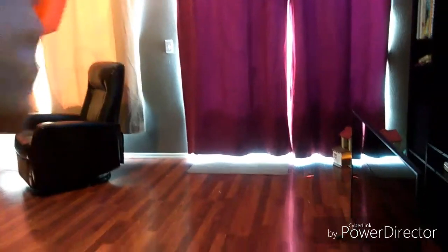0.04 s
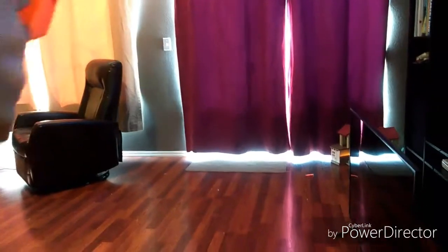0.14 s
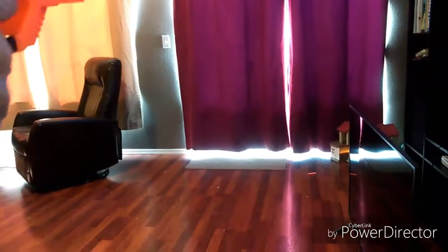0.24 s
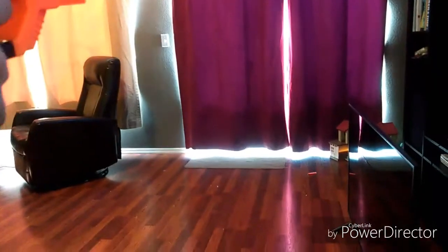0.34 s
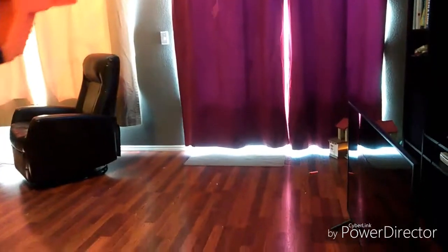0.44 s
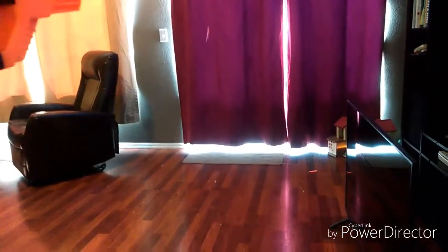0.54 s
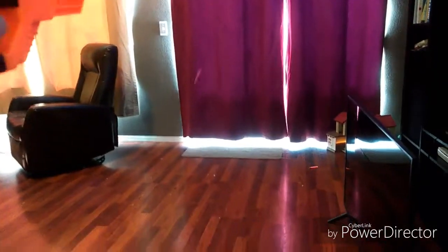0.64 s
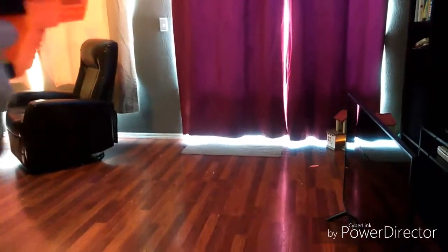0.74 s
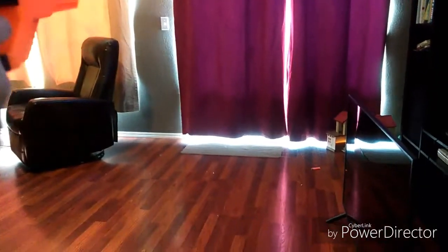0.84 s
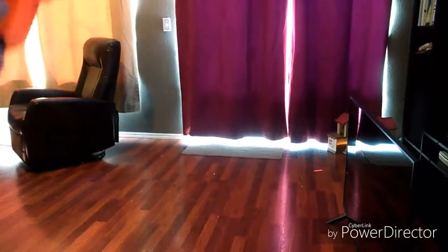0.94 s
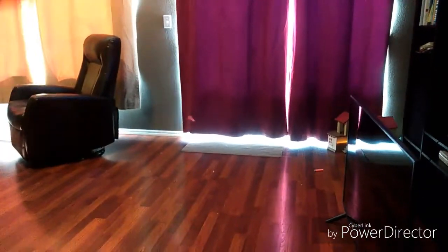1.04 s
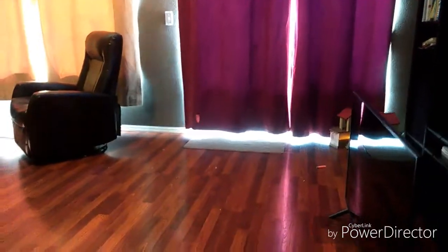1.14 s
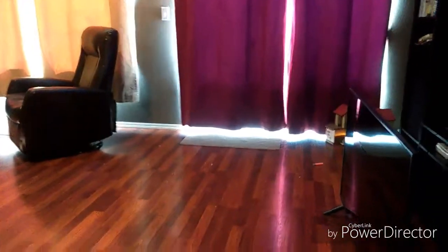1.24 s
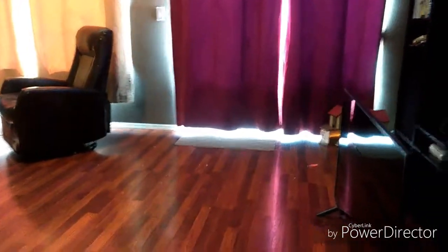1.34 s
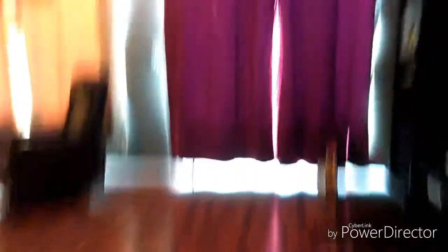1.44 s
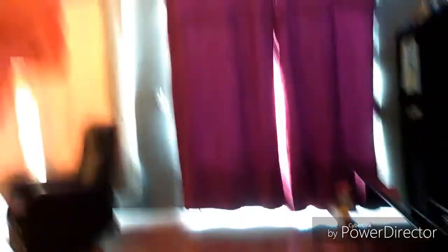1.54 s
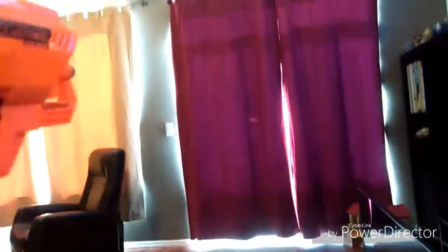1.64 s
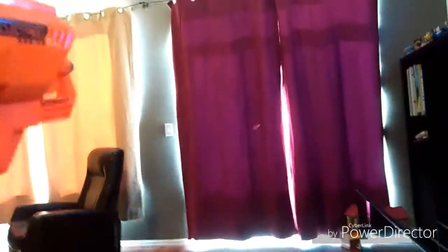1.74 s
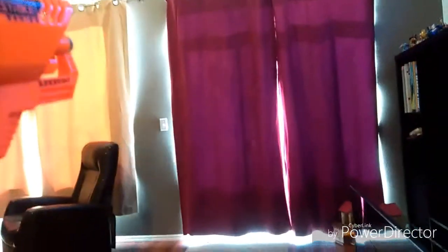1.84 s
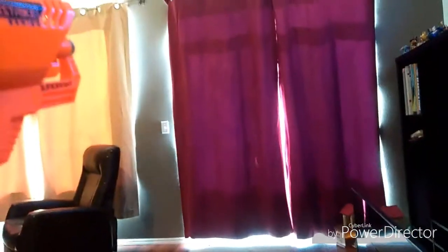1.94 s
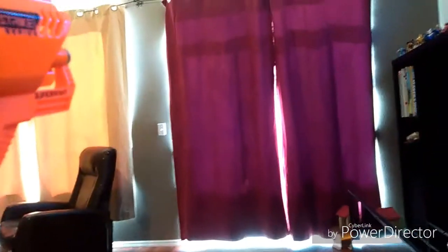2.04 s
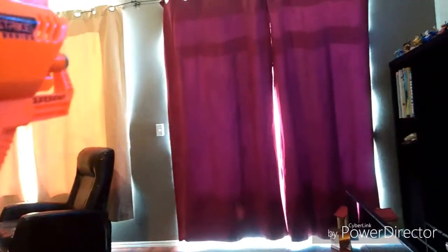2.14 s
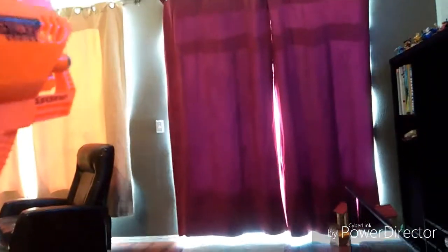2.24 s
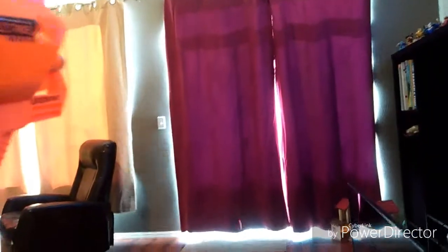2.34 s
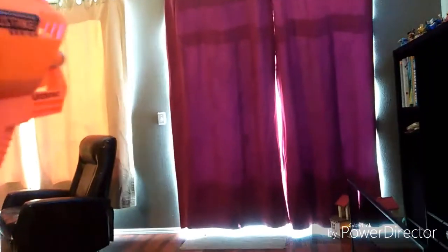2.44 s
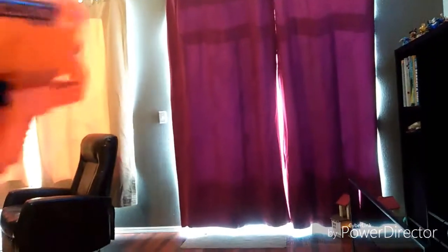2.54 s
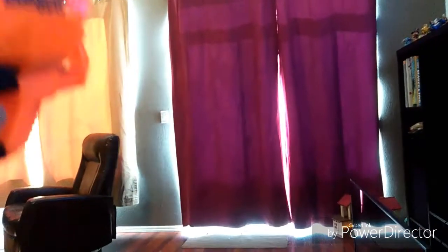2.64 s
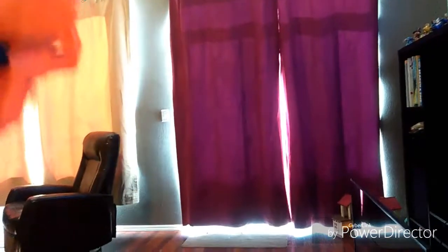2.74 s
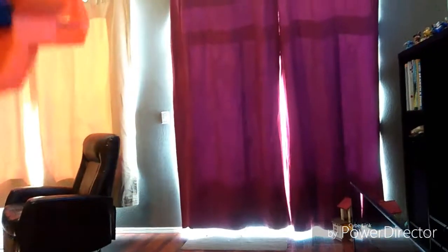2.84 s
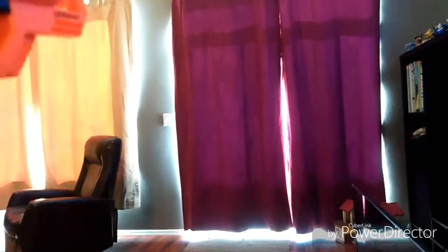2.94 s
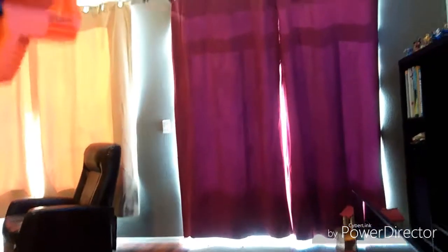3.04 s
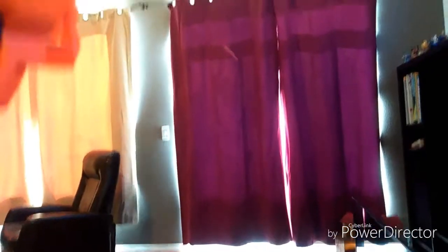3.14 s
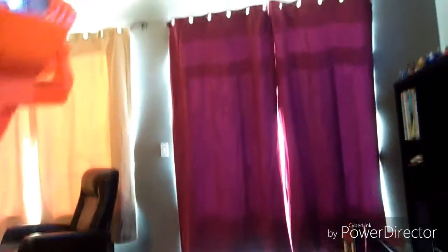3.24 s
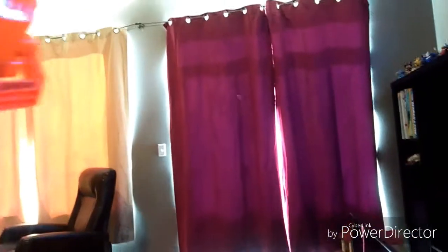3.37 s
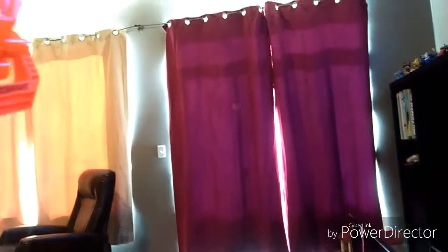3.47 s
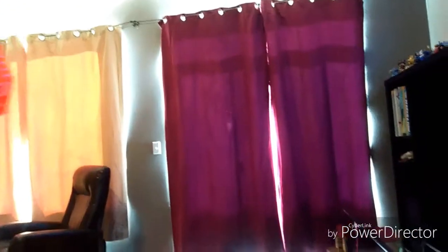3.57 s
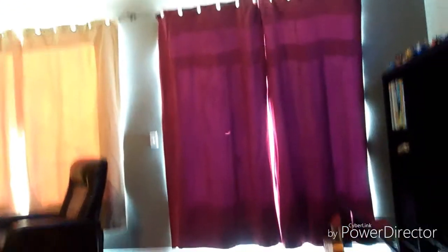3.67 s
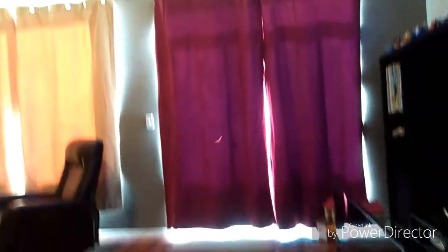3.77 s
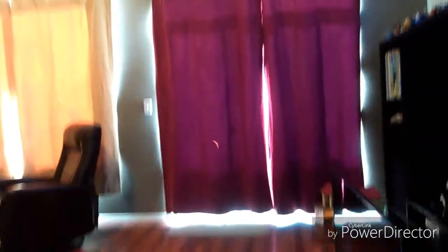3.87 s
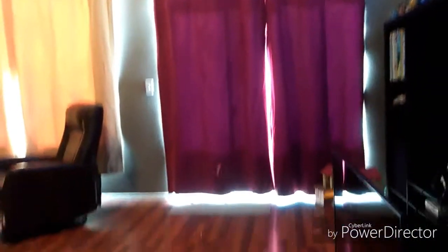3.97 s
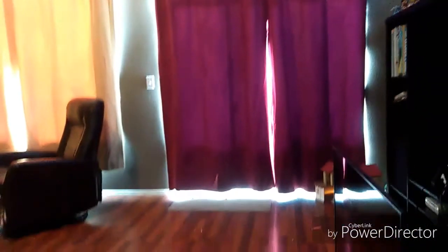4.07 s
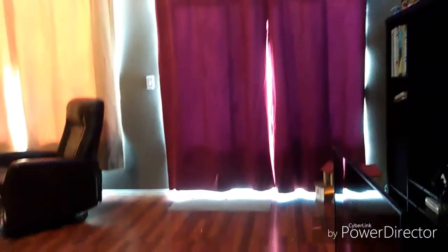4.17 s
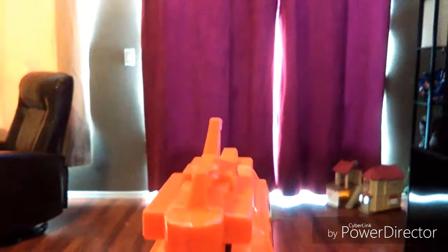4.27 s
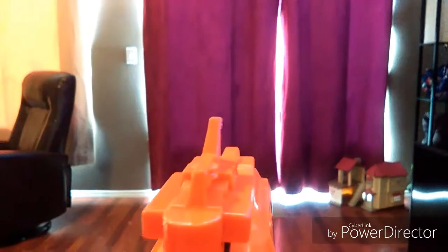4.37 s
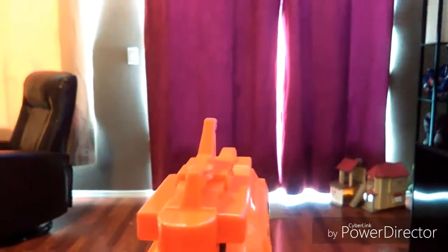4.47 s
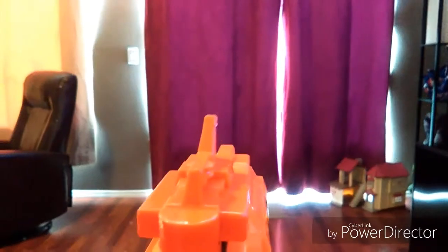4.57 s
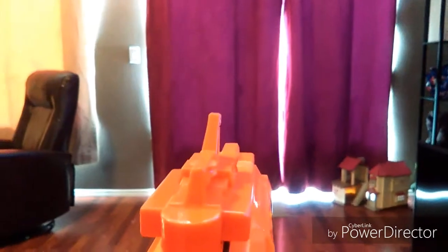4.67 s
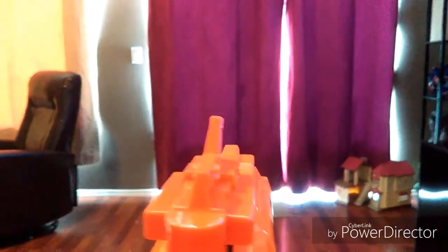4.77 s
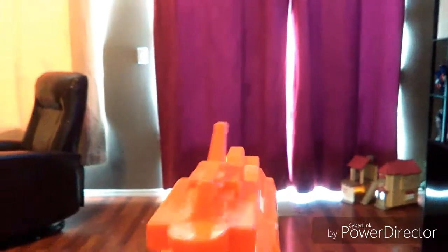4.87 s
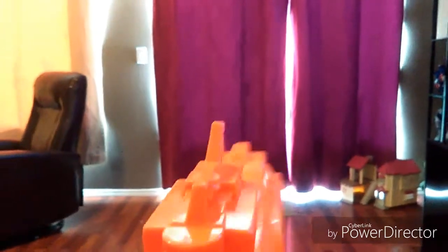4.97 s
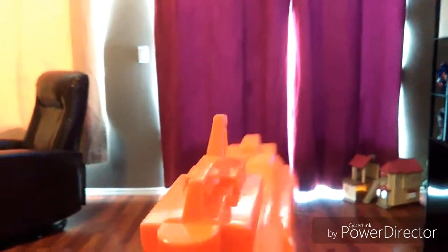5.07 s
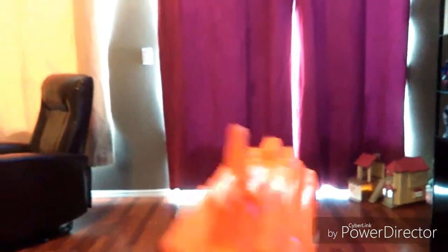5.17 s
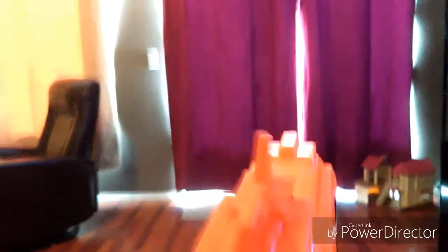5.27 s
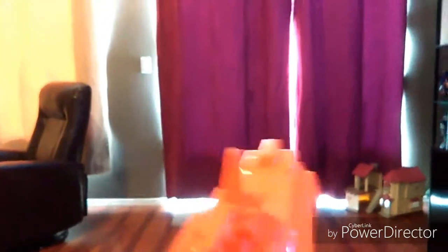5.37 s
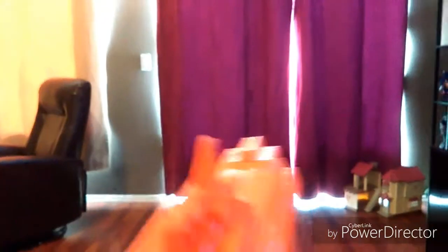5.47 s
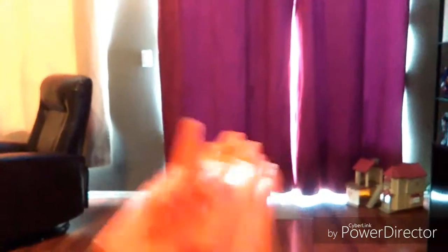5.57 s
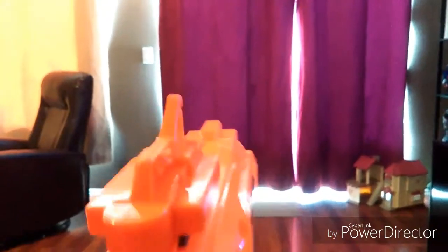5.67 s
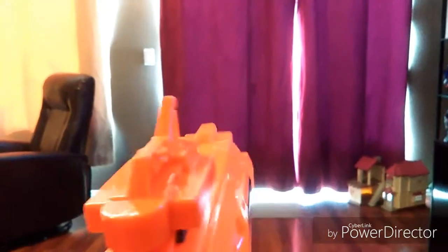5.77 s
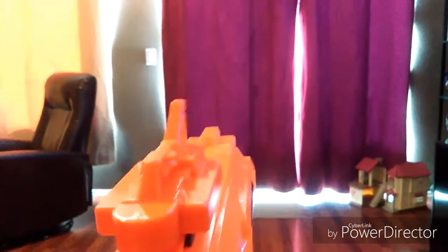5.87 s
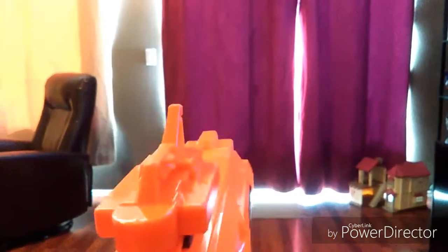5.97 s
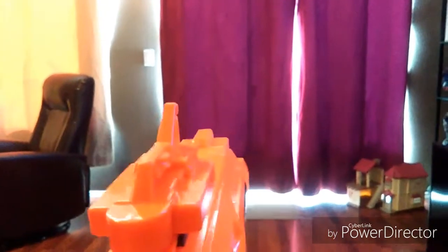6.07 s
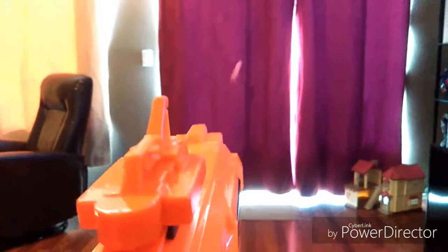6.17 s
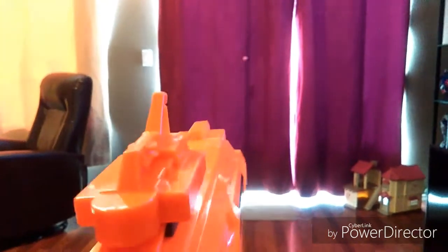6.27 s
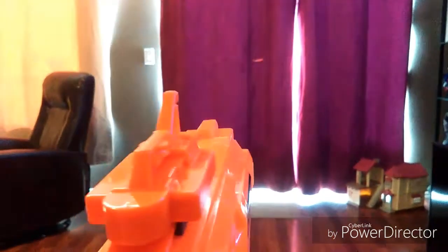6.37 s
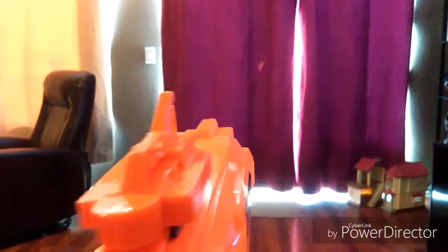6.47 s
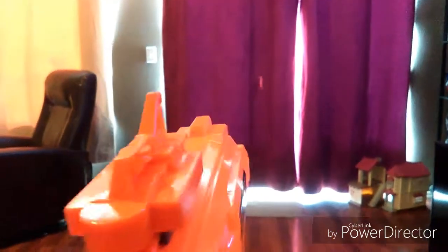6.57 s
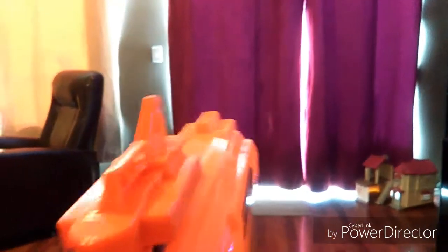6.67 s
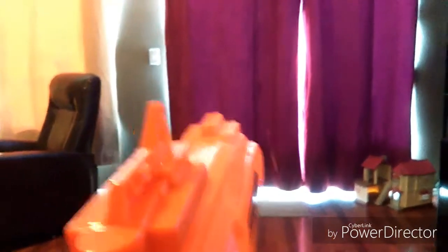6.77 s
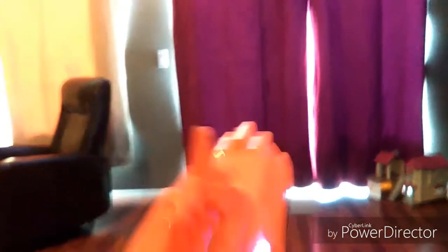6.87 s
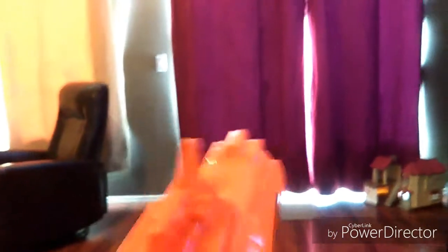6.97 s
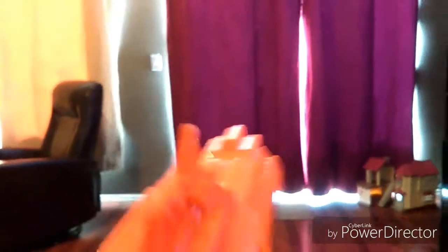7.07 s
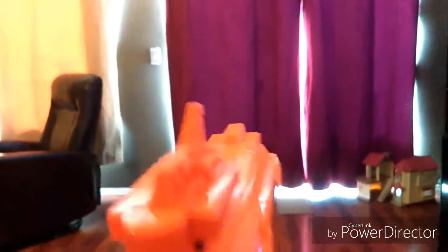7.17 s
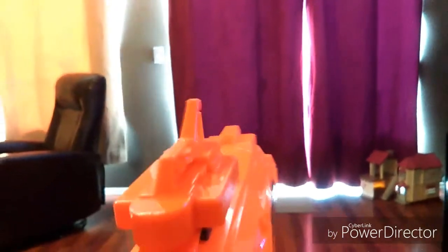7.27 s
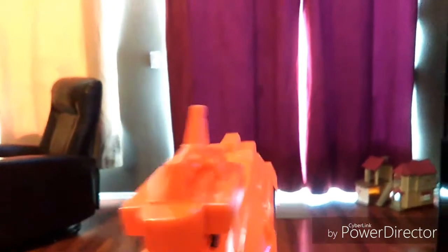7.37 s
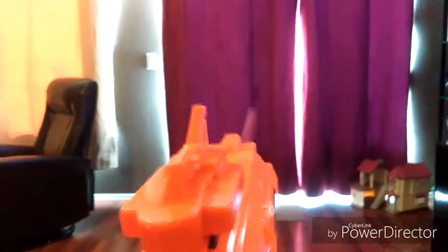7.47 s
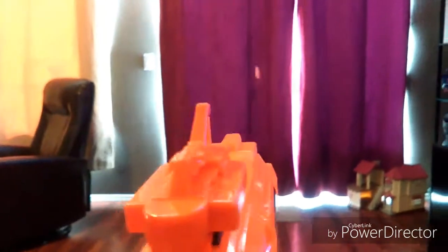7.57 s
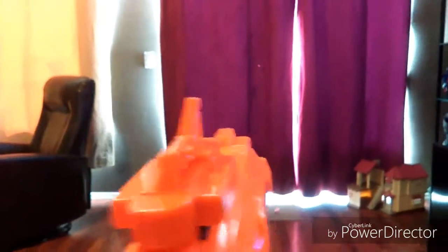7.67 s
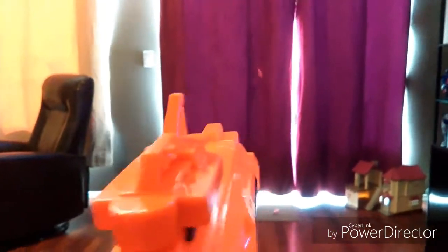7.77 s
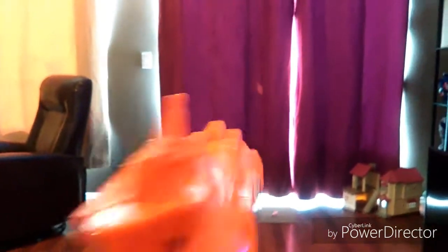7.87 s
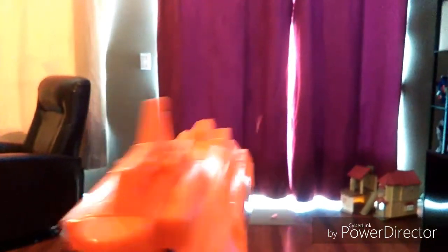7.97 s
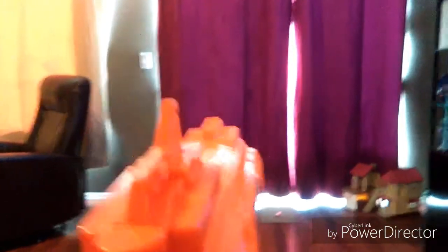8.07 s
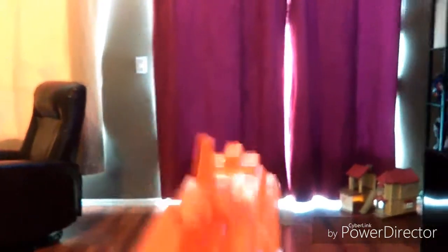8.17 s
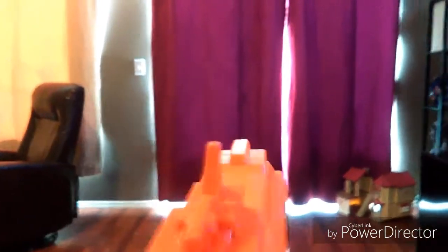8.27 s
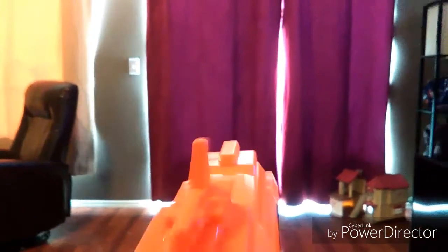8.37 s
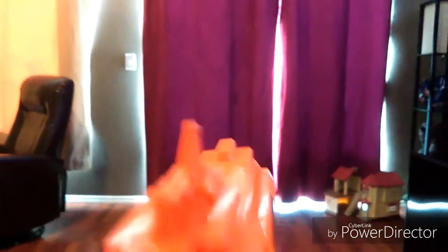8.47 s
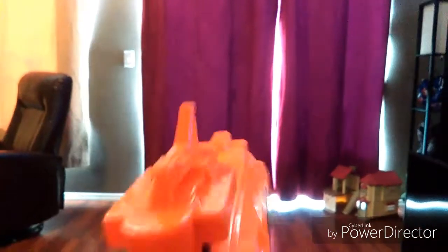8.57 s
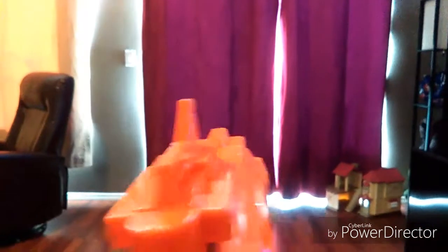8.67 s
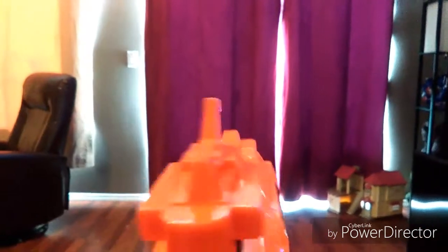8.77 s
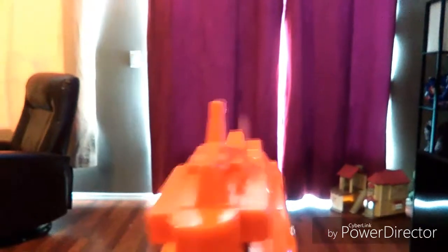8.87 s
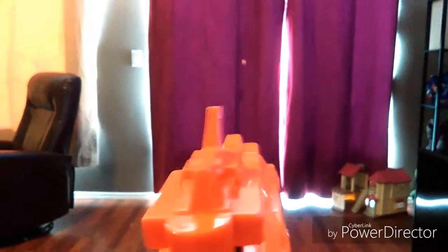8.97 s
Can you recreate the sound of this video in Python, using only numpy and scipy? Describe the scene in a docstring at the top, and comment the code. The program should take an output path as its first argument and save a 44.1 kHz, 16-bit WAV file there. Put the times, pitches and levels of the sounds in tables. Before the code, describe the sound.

Close stereo pickup of a hollow plastic toy dart blaster in a reverberant hard-floored living room, over low house rumble, faint hiss and, until 4.2 s, a very faint steady tone. A slide scrape leads to a shot at 0.2 s: a rapid cluster of snaps, a ringing tube and spring, then a dart thudding softly into a curtain at 0.4. Loud racking clacks come at 0.8-1.1, a shot at 1.6 and thud at 1.85. Small fumbling ticks build into hard clacks at 2.7-3.0; a shot at 3.3 rings long, thud at 3.5. Sound cuts to silence at 4.2, then fades in from about 4.4 to 4.75, blaster more to the left. Scraping and clacks at 5.1-5.7, shot at 6.35, thud at 6.6; racking at 6.9-7.3, shot at 7.7, ticking thud at 7.9; final racking at 8.2-8.6, then light clicks to 9.0.

```python
"""A toy dart blaster is primed and fired five times close to a camera in a hard-floored living room.
The slide scrapes in noisy slips; slide, catch and trigger clack in crackles that ring the shell.
Each plunger slam rings tube and spring as decaying sines; each dart thuds into a curtain across the room.
Low house rumble, hiss and at first a faint tone lie beneath. After a short silence the sound fades
in again with the blaster held at another place."""
import sys
import numpy as np
from scipy import signal
from scipy.fft import rfft, irfft
from scipy.io import wavfile
from scipy.ndimage import uniform_filter1d

SR = 44100
rng = np.random.default_rng(int(sys.argv[2]) if len(sys.argv) > 2 else 0)


def log_audio(samples):
    """Write samples as a 16-bit WAV file to the path given in sys.argv[1]."""
    # one column per channel
    frames = np.atleast_2d(samples).T
    # limit to full scale, then quantise
    limited = np.clip(frames, -1, 1)
    pcm = np.round(limited * 32767).astype(np.int16)
    wavfile.write(sys.argv[1], SR, pcm)


N = 397782

# colour of the plastic shell at the first place: [hz, density_db (per Hz)]
SHELL_COLOUR = [(150, -56), (250, -27.5), (906, -8), (1580, -6.5), (1880, -7), (2320, -5), (3230, -2.5),
                (4410, -8), (5540, -9), (6470, -13), (13700, -28.5), (15200, -41), (16000, -41)]
# where the blaster is held: [start_s, left_lead_s, left_over_right_db (at 1 kHz), more_db_per_octave, room_share_db]
PLACES = [(0, .0003, 2, 1.5, -3), (4.3, 0.00019, 7.5, 2, -2.5)]
# how alike left and right are, in the room's return and in the hush: [hz, likeness (1 is identical)]
LIKENESS = [(60, 0.27), (180, 0.94), (350, .9), (550, 0.49), (1650, 0.08), (4970, 0), (15000, 0.1)]


def gain_of(db):
    """Turns decibels into an amplitude factor."""
    return 10 ** (np.asarray(db) / 20)


def evened(x):
    """Scales to rms 1."""
    return x / np.sqrt(np.mean(x ** 2) + 1e-20)


def read(points, hz):
    """Reads a table between its points on a log-frequency axis."""
    f, value = np.transpose(points)
    return np.interp(np.log(hz + 1), np.log(f + 1), value)


def add(mix, s, sound):
    """Mixes a sound in at time s."""
    part = mix[round(s * SR):][:len(sound)]
    part += sound[:len(part)]


def coloured(x, points):
    """Filters x by a spectrum in dB."""
    hz = np.fft.rfftfreq(len(x), 1 / SR)
    return irfft(rfft(x) * gain_of(read(points, hz)), len(x))


def ring(modes, seconds):
    """Sums decaying sines, one for each mode (hz, level_db, t60_s)."""
    t = np.arange(round(seconds * SR)) / SR
    return sum(gain_of(db - 60 * t / t60) * np.sin(2 * np.pi * hz * t) for hz, db, t60 in modes)


def drifting(x, samples):
    """Smooths noise twice into a slow drift of rms 1."""
    return evened(uniform_filter1d(uniform_filter1d(x, samples), samples))


def slide():
    """Dense uneven slips along the rails excite the shell while the slide moves."""
    # strokes of the slide: [start_s, end_s, level_db]
    strokes = [(0, .19, -59), (0.723, .93, -59), (1.427, 1.57, -73), (2.27, 2.75, -73), (3.08, 3.26, -70),
               (5.128, 5.44, -61), (6.829, 7.05, -65), (8.205, 8.4, -54)]
    slips_per_s, ramp_s = 3000., .01
    size = gain_of(4.6 * np.minimum(rng.exponential(1, N), 5))
    happens = rng.random(N) < slips_per_s / SR
    slips = size * happens * rng.choice([-1, 1], N)
    t = np.arange(N) / SR
    level = sum(gain_of(db) * np.clip(np.minimum(t - start, end - t) / ramp_s, 0, 1)
                for start, end, db in strokes)
    return level * evened(coloured(slips, SHELL_COLOUR))


def hush():
    """Low house rumble and hiss: random short-time spectra, with drifting patches below 800 Hz."""
    # colour of the quiet house: [hz, density_db (per Hz)]
    house_colour = [(12, -50), (20, -18), (27, -19), (91, -18), (135, -6.5), (205, -14), (257, -10),
                    (613, -24.5), (6300, -37), (15000, -39), (16400, -58.5)]
    level_db, patch_db = -57.5, 2.2
    frames, hz = N // 256 + 5, np.fft.rfftfreq(1024, 1 / SR)
    a, b, c, d, patches = rng.standard_normal((frames, 513, 5)).T
    patches = evened(uniform_filter1d(uniform_filter1d(patches, 8, 0), 14, 1))
    same = np.clip(read(LIKENESS, hz), -1, 1)[:, None]
    left, other = a + 1j * b, c + 1j * d
    z = np.array([left, same * left + np.sqrt(1 - same ** 2) * other])
    z *= gain_of(read(house_colour, hz)[:, None] + patch_db * patches * (hz[:, None] < 800))
    sound = signal.istft(z, nperseg=1024, noverlap=768)[1][:, :N]
    return gain_of(level_db) * evened(sound)


def hum():
    """A faint steady pitch whose level wanders, gone once the silence has come."""
    # the tone: [hz, level_db, end_s]
    hz, db, end = (474, -66.5, 4.3)
    t = np.arange(N) / SR
    wander_db = 2.2 * drifting(rng.standard_normal(N), 2000)
    return gain_of(db + wander_db) * np.sin(2 * np.pi * hz * t) * (t < end)


def clack_rows():
    """Lists all clacks: a shot is five, as the catch lets go and the plunger lands, chatters, rebounds, settles."""
    # clacks of slide, catch and trigger: [time_s, level_db, bass_share_db, treble_share_db]
    handling = [(0.0551, -41.5, 6, -43), (0.0972, -35.5, 0, -3.5), (0.732, -48, -10, -18),
                (0.758, -37, 10.5, 0), (0.813, -22.5, 8.5, -6), (0.844, -33, -16, 6.5),
                (.8632, -22.5, -24, -3), (0.877, -23.5, -0.5, -1), (0.894, -30.5, -9, 10.5),
                (0.9293, -18, -19, 5), (.9413, -9, -9.5, -4.5), (0.9621, -6.5, -3, 2.5),
                (0.9725, -22, -9, -9), (1.1121, -22.5, -2.5, 1.5), (1.1179, -25, 0, -9),
                (1.124, -26, -6.5, -3), (1.13, -30.5, -2.5, -18.5), (1.417, -41.5, 6, -4.5),
                (1.425, -37, -11, -7), (1.439, -56, -9, -19), (2.009, -46.5, 3, -13),
                (2.1122, -50.5, -4, -25), (2.2723, -56.5, -1, -6), (2.361, -52.5, -1, -1.5),
                (2.4159, -41.5, 0, -22), (2.459, -42, 7, -16), (2.483, -45.5, 14.5, -26),
                (2.5186, -35, 5.5, -3), (2.5314, -47, 5, -3), (2.55, -41, 5, -2.5),
                (2.609, -40, -16, -16.5), (2.7018, -33, 5, -7), (2.7393, -23.5, -0.5, -7.5),
                (2.7531, -20, 0, -1), (2.761, -13.5, -3, 2), (2.774, -13.5, 7, 3.5),
                (2.7793, -12.5, 4, 3.5), (2.7929, -9.5, -16, 1), (2.8013, -8, -9.5, 3.5),
                (2.817, -13.5, -30, 5.5), (2.9517, -24.5, -16, -5), (2.9585, -17.5, -7.5, -3.5),
                (2.964, -26, -4, -10.5), (2.971, -33.5, -10, -10), (3.183, -47, -28, 0),
                (3.208, -35, -3, -4.5), (3.223, -51, 14, -12.5), (5.1, -46, -13, 3), (5.139, -56, 13, -5),
                (5.1684, -39.5, 6, 2.5), (5.1918, -40.5, 4, 7.5), (5.2192, -43, 5.5, -3.5),
                (5.2817, -34.5, 3, 1), (5.3199, -32, -1, 4), (5.3404, -28, -1, -9), (5.362, -26.5, 4, 9),
                (5.393, -38, 5, -12.5), (5.3999, -30.5, -2, 3), (5.4411, -15.5, -6, 4),
                (5.452, -12.5, -7.5, 3.5), (5.4958, -12, -4, 3), (5.664, -23, 1, 0), (5.951, -35, 11.5, 1),
                (6.0279, -44, 9, -3.5), (6.0668, -35.5, 7, -2), (6.8398, -50, 12.5, -3),
                (6.8588, -39.5, 9, 0), (6.922, -24, 8.5, -6), (6.9567, -35, -15, 10),
                (6.975, -24, -3, -0.5), (6.9897, -21, 3, 4.5), (7.0539, -14.5, -3, -2),
                (7.0647, -14, -3, 5.5), (7.1026, -12.5, 4, 2.5), (7.2672, -23, -3.5, -1),
                (7.2787, -32.5, 9.5, 2), (7.598, -42.5, 2, 3.5), (7.6128, -38, 10.5, -2),
                (7.6845, -50.5, 20.5, -8), (8.188, -46, 4, -5), (8.236, -42, 10.5, -5),
                (8.2866, -34.5, 8, -0.5), (8.3218, -32, 3, 2), (8.341, -20, -11, 0),
                (8.3564, -24.5, 1, 8.5), (8.4083, -13.5, -10.5, 1.5), (8.419, -18.5, -6, 3),
                (8.4656, -14.5, 4, 2.5), (8.5672, -25, 0, 1), (8.5835, -29, 3, -5),
                (8.767, -44.5, 13.5, -7), (8.896, -35.5, 10.5, 2.5), (8.9054, -38, 10, -15),
                (8.99, -33.5, 8.5, -4.5)]
    # shots: [catch_release_s, strength_db, rebound_weaker_db (the last three clacks)]
    shots = [(0.1997, 2, 0.5), (1.5830, -0.5, -1.5), (3.269, -1, -2), (6.3490, -1, -0.5), (7.709, 3, 5)]
    # the five clacks of a shot: [level_db, bass_share_db, treble_share_db]
    shot_clacks = [(-15, -10, 5.5), (-17.5, -5.5, 4), (-17.5, -9.5, -4), (-12, -11.5, 0.5),
                   (-19.5, -8, -10)]
    # when those five come: [delay_s (after the catch lets go)]
    delays = [0, .0082, .0190, .0312, .0420]
    rows = []
    for s, strength_db, weaker_db in shots:
        for delay, (db, *shares) in zip(delays, shot_clacks):
            level_db = db + strength_db - weaker_db * (delay > delays[1])
            rows.append((s + delay, level_db, *shares))
    return rows + handling


def clacks():
    """Short shell-coloured crackles ring hollow body and panels; the room gets even pulses of equal energy."""
    # colour of the shell heard from behind, at the second place: [hz, density_db (per Hz)]
    rear_colour = [(150, -65.5), (250, -32.5), (748, -1.5), (1100, -8), (1530, 1.5), (1880, -2.5),
                   (2440, 1), (2810, -1.5), (3520, -0.5), (5630, -5.5), (7060, -8.5), (14200, -23),
                   (16000, -42.5)]
    # hollow body modes that the bass of a clack sets ringing: [hz, level_db, t60_s]
    body_modes = [(700, -11, 0.047), (1016, -4, 0.044)]
    # modes of the shell panels: [hz, level_db, t60_s]
    panel_modes = [(2428, -17, 0.056), (2558, -11.5, .03), (2943, -15.5, .025), (3304, -15, 0.022),
                   (3570, -6.5, 0.024), (4320, -17.5, 0.035)]
    rise_s, t60_s, knock_db = .001, .023, -12.5
    panel_spread_db, panel_detune = 5.5, 0.031  # chance level and pitch, a new draw each clack
    shell_low_hz = 338  # the clacks carry little below this
    out, even = np.zeros(N), np.zeros(N)
    t, hz = np.arange(2048) / SR, np.fft.rfftfreq(2048, 1 / SR)
    shape = (1 - np.exp(-t / rise_s)) ** 2 * gain_of(-60 * t / t60_s)
    shape /= shape.max()
    rows = clack_rows()
    for (s, level_db, bass_db, treble_db), noise in zip(rows, rng.standard_normal((len(rows), 2048))):
        shell = rear_colour if s > PLACES[1][0] else SHELL_COLOUR
        tilt = [(900, bass_db), (1900, 0), (5000, 0.011), (8000, treble_db)]
        colour = gain_of(read(shell, hz) + read(tilt, hz))
        middle = np.sqrt(np.mean(colour ** 2 * (hz > 1500) * (hz < 6000)))
        colour *= gain_of(level_db) / middle  # the level is that of the middle band
        add(out, s - rise_s, irfft(rfft(noise) * colour) * shape)
        add(out, s, gain_of(level_db + bass_db + knock_db) * ring(body_modes, .05))
        panels = [(f * (1 + panel_detune * w), level_db + db + panel_spread_db * z, t60)
                  for (f, db, t60), z, w in zip(panel_modes, noise, noise[::-1])]
        add(out, s, ring(panels, .05))
        # the room hears the shell from all sides; the shift makes room for the pulse's front half
        add(even, s - .001, np.roll(irfft(colour), 100) * np.linalg.norm(shape))
    high_pass = signal.butter(3, shell_low_hz, "high", fs=SR, output="sos")
    return signal.sosfilt(high_pass, out), even


def plunger():
    """The slam rings the tube unsteadily among rattling parts, the spring faint and long; pushed air thumps."""
    # slams: [time_s, ring_db, ring_hz, ring_t60_s, thump_db, spring_db, linger_db, damped_after_s]
    slams = [(0.2097, -8, 1225, 0.1, -19, -50, -47, 0.2), (1.592, -10.5, 1222, 0.33, -26, -48.5, -40, .6),
             (3.279, -8, 1226, 0.44, -28, -45.5, -40, 0.43),
             (6.36, -13.5, 1221, 0.23, -20.5, -60.5, -33, 0.48),
             (7.717, -12.5, 1223, 0.43, -18.5, -66, -33.5, 0.59)]
    # tube modes: [pitch_factor (times ring_hz), level_db]
    tube_modes = [(1., -2.5), (1.036, -15), (.985, -13.5)]
    # spring modes: [hz, level_db, t60_s]
    spring_modes = [(1178, -6.5, 4), (1537, -1.5, 2.7), (995, -9.5, 1.7)]
    # colour of the loose parts around the tube: [hz, density_db (per Hz)]
    rattle_colour = [(800, -20.5), (1050, -3), (1200, 6), (1350, -2), (1700, -35)]
    air_modes = [(150., -2.5, 0.023), (256.0, -9.5, 0.015)]  # hz, level_db, t60_s
    out, t = np.zeros(N), np.arange(SR) / SR
    for slam, noise in zip(slams, rng.standard_normal((len(slams), 2, SR))):
        s, ring_db, hz, t60, thump_db, spring_db, linger_db, damped = slam
        waver = 1 + 0.47 * drifting(noise[0], 500) * np.minimum(t / 0.042, 1)
        tube = waver * ring([(hz * k, db, t60) for k, db in tube_modes], 1)
        rattle = evened(coloured(noise[1], rattle_colour)) * gain_of(-11.0 - 60 * t / 0.55)
        add(out, s, gain_of(ring_db) * (tube + rattle))
        add(out, s, ring([(hz, linger_db, 1.2)], damped))  # the ring lingers until a hand damps it
        add(out, s, gain_of(spring_db) * ring(spring_modes, 1))
        add(out, s - .007, gain_of(thump_db) * ring(air_modes, .1))  # the air comes first
    return out


def darts():
    """Each dart is a rough low burst in heavy cloth with a tick of its tip; the room gets an even pulse of each."""
    # landings: [time_s, level_db, tick_share_db, cloth_t60_s]
    landings = [(0.4, -23.5, 4.5, 0.075), (1.854, -25.5, 2.5, 0.057), (3.517, -23.5, 4.5, 0.03),
                (6.587, -22, -2, 0.043), (7.908, -28, 18.5, 0.046)]
    # colour of the struck curtain: [hz, density_db (per Hz)]
    curtain_colour = [(35, -51), (60, -16), (177, 8.5), (286, 7), (450, -1), (637, -3.5), (860, -18.5),
                      (1000, -10.5), (1300, -41), (2200, -100)]
    # colour of the tip's tick: [hz, density_db (per Hz)]
    tip_colour = [(500, 0.5), (2000, 2), (5000, -3.5), (12000, -22)]
    cloth_share_db, tick_t60_s, rise_s = 3., .03, 0.0034
    out, even = np.zeros(N), np.zeros(N)
    t, hz = np.arange(4096) / SR, np.fft.rfftfreq(4096, 1 / SR)
    for (s, level_db, tick_db, t60), noise in zip(landings, rng.standard_normal((len(landings), 2, 4096))):
        parts = (tip_colour, tick_db, tick_t60_s), (curtain_colour, cloth_share_db, t60)
        for (points, share_db, decay), z in zip(parts, noise):
            colour = gain_of(read(points, hz))
            colour *= gain_of(level_db + share_db) / np.sqrt(np.mean(colour ** 2))
            shape = (1 - np.exp(-t / rise_s)) * gain_of(-60 * t / decay)
            add(out, s, irfft(rfft(z) * colour) * shape)
            add(even, s - .005, np.roll(irfft(colour), 400) * np.linalg.norm(shape))
    return out, even


def hand_bumps():
    """A hand shifts on the body: three smoothly swelling periods of a low sine."""
    # bumps: [time_s, peak_db, hz]
    bumps = [(3.15, -44.5, 90.3), (5.357, -41, 280)]
    out = np.zeros(N)
    for s, peak_db, hz in bumps:
        length = round(3 * SR / hz)
        add(out, s, gain_of(peak_db) * np.hanning(length) * ring([(hz, 0, 1)], 1)[:length])
    return out


def near_ports(x, lead, pan_db, per_octave_db):
    """The left microphone port hears first; the camera body shades and scatters the treble of the right one."""
    hz = np.fft.rfftfreq(N, 1 / SR)
    half_db = .5 * (pan_db + per_octave_db * np.log2(np.maximum(hz, 250) / 1000))
    scatter = rng.standard_normal(200) * np.exp(-np.arange(200) / SR / 0.0025)
    scatter = rfft(scatter / np.linalg.norm(scatter), N)
    share = np.clip(read([(1300, 0.27), (2500, 0.68)], hz), 0, 1)
    late = np.sqrt(1 - share ** 2) * np.exp(-2j * np.pi * hz * lead) + share * scatter
    z = rfft(coloured(x, [(40, -22.5), (110, -1)]))  # the near sounds carry no deep bass
    return np.array([irfft(z * gain_of(half_db), N), irfft(z * gain_of(-half_db) * late, N)])


def room(x):
    """Sparse reflections of random sign, each band dying at its own speed; the low mids are alike at both ports."""
    # decay of the living room: [hz, t60_s]
    room_decay = [(100, 0.13), (260, .43), (700, 0.56), (1840, 0.56), (4850, 0.52), (12800, 0.42)]
    # colour of the room's return: [hz, level_db]
    wall_colour = [(40, -17.5), (100, -0.5), (250, -2), (2000, -0.5), (2550, 0.5), (2900, 1), (3500, 2.5),
                   (4200, -1), (5000, -0.5), (12000, -2.5)]
    taps = np.zeros((2, SR))
    # one reflection in every 20 samples, at a random place
    at = np.arange(150, SR - 20, 20) + rng.integers(0, 20, (2, (SR - 151) // 20))
    np.put_along_axis(taps, at, rng.choice([-1., 1.], at.shape), 1)
    hz, t, z = signal.stft(taps, SR, nperseg=256)
    same = np.clip(read(LIKENESS, hz), 0, 1)[:, None]
    z[1] = same * z[0] + np.sqrt(1 - same ** 2) * z[1]
    decay = gain_of(-60 * t / read(room_decay, hz)[:, None])
    tail = signal.istft(z * decay, SR, nperseg=256)[1]
    tail /= np.linalg.norm(tail[0])
    return signal.fftconvolve(coloured(x, wall_colour)[None], tail, axes=1)[:, :N]


def scene():
    """Blaster near the ports at either place, darts across the room, the room's return, hush and hum."""
    near, even = clacks()
    body = slide() + plunger() + hand_bumps()
    far, far_even = darts()
    place = np.searchsorted([row[0] for row in PLACES], np.arange(N) / SR, "right") - 1
    direct = sum(near_ports((near + body) * (place == k), *row[1:4]) for k, row in enumerate(PLACES))
    far_ports = np.array([far, np.roll(far, 3)])  # the right port hears the darts 3 samples later
    room_share = gain_of([row[4] for row in PLACES])[place]
    send = (even + body) * room_share + gain_of(1.5) * far_even
    return direct + far_ports + room(send) + hush() + hum()


def record(dry):
    """Gain control ducks loud blows late, then recovers; soft clipping, the cut and fade-in, the band limit."""
    threshold_db, share_taken_off, excess_fall_db_per_s, lag_s = -17, .95, 83.5, 0.0086
    first_db, cut_s, fade_from_s, fade_s, fade_bend = 3, 4.224, 4.363, .38, 1.5
    edge_hz = 16300
    power = uniform_filter1d((dry ** 2).mean(0), 301, origin=150)  # over the last 7 ms
    fall = np.arange(N) * excess_fall_db_per_s / SR
    # the held level follows each rise at once and falls at a steady rate
    held_db = np.maximum.accumulate(10 * np.log10(abs(power) + 1e-12) + fall) - fall
    over_db = np.maximum(held_db - threshold_db, 0)
    late_db = np.roll(uniform_filter1d(over_db, 401, origin=200), round(lag_s * SR))  # the gain lags the blow
    ducked = np.tanh(dry / gain_of(share_taken_off * late_db))
    t = np.arange(N) / SR
    before = gain_of(first_db) * np.clip((cut_s - t) / 0.0024, 0, 1)
    after = np.clip((t - fade_from_s) / fade_s, 0, 1) ** fade_bend
    low_pass = signal.firwin(511, edge_hz, window=("kaiser", 9), fs=SR)
    return signal.oaconvolve(ducked * (before + after), low_pass[None], "same")


dry = scene()
out = record(dry)
log_audio(out)
```